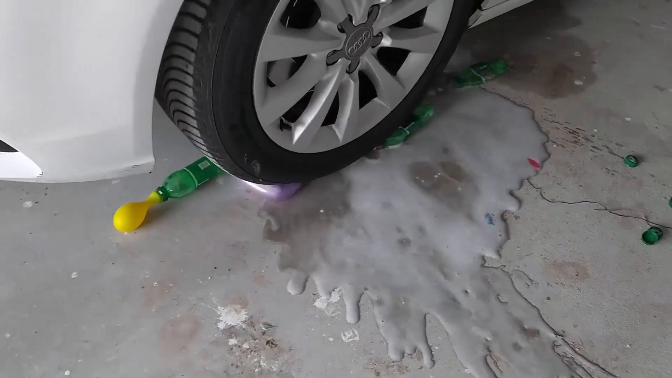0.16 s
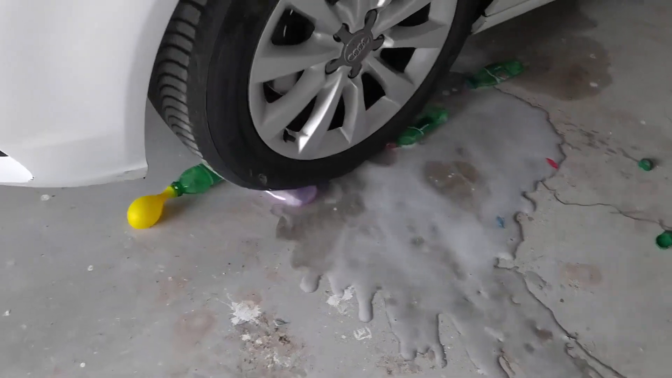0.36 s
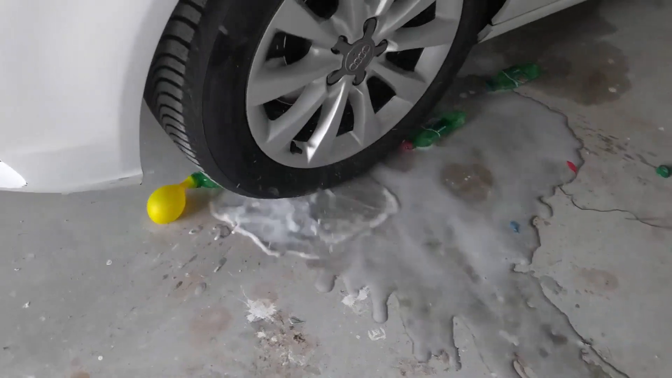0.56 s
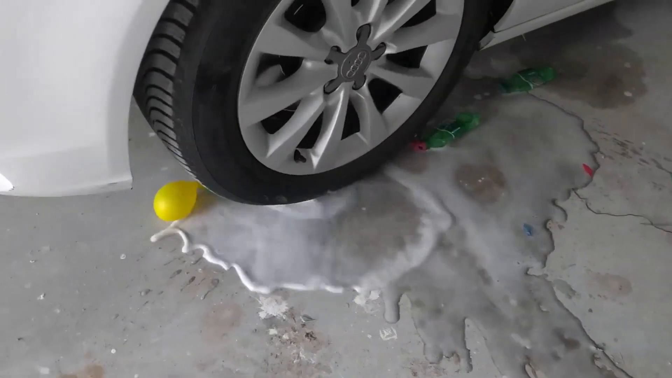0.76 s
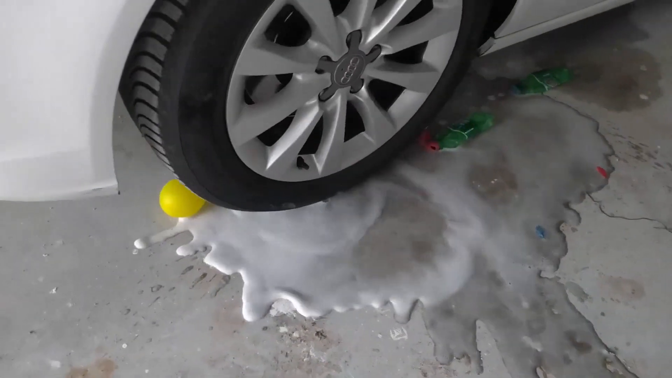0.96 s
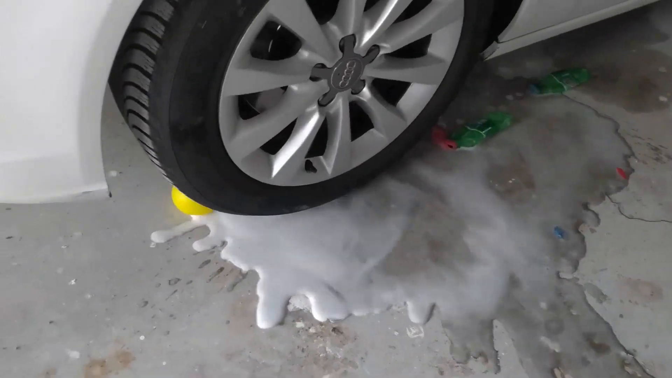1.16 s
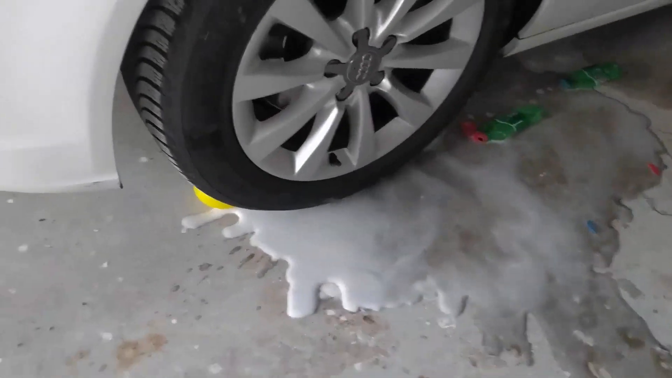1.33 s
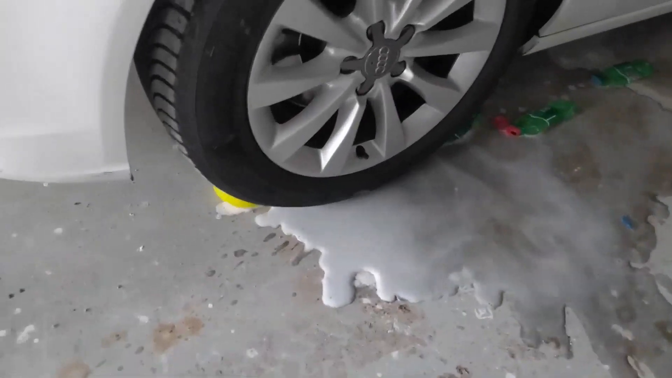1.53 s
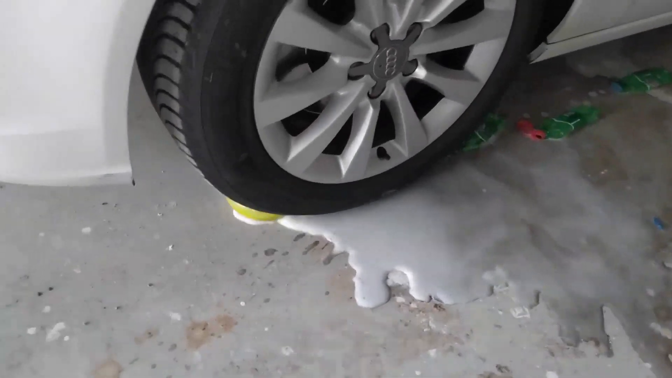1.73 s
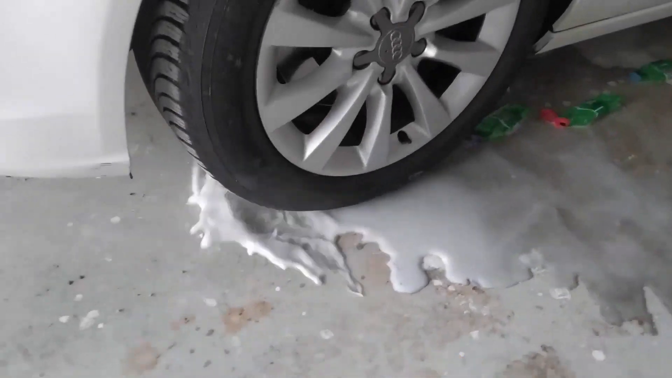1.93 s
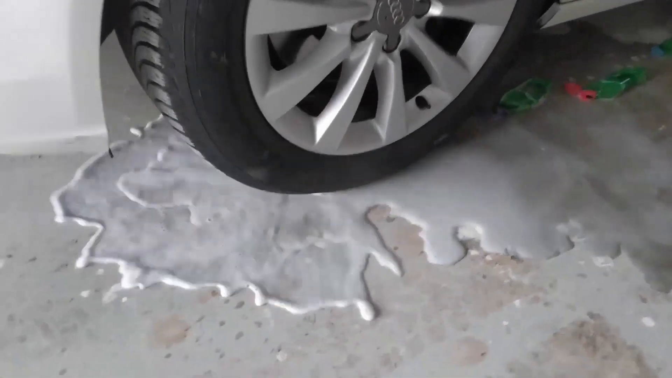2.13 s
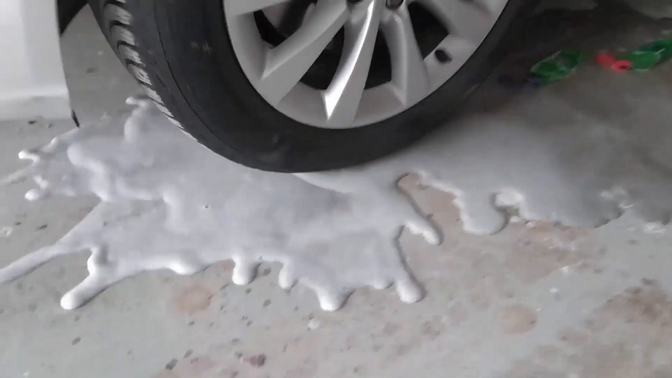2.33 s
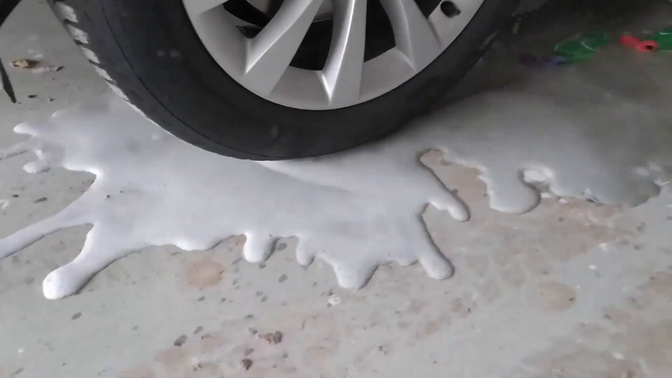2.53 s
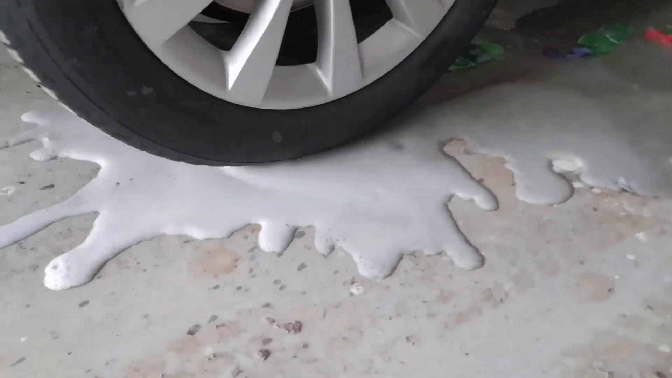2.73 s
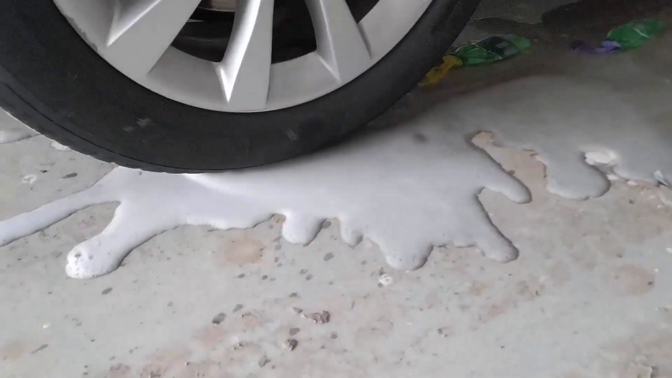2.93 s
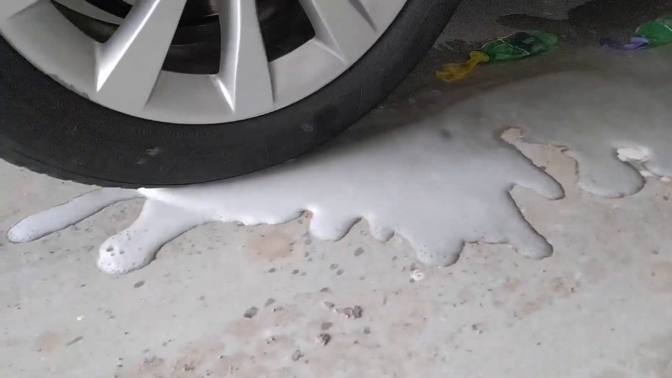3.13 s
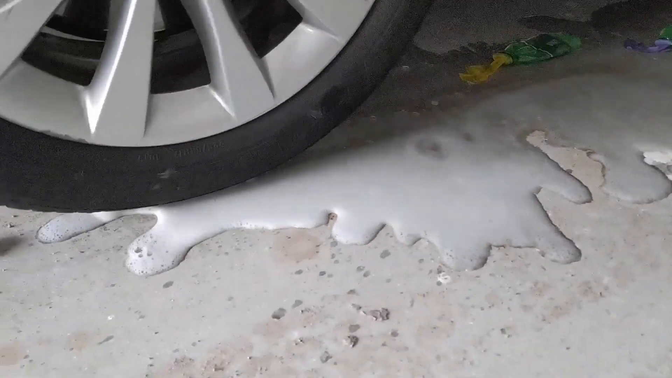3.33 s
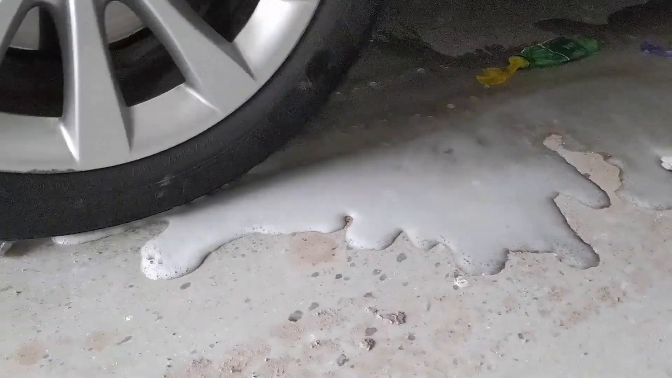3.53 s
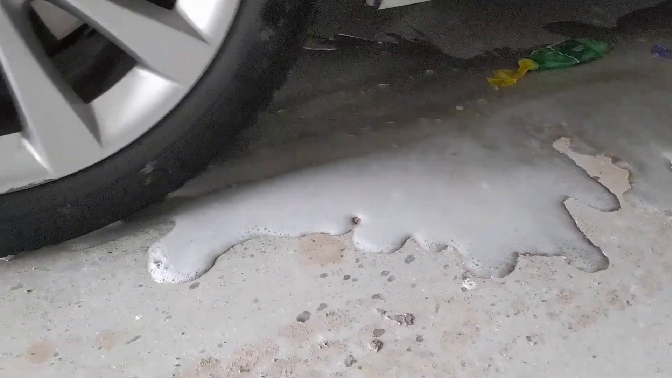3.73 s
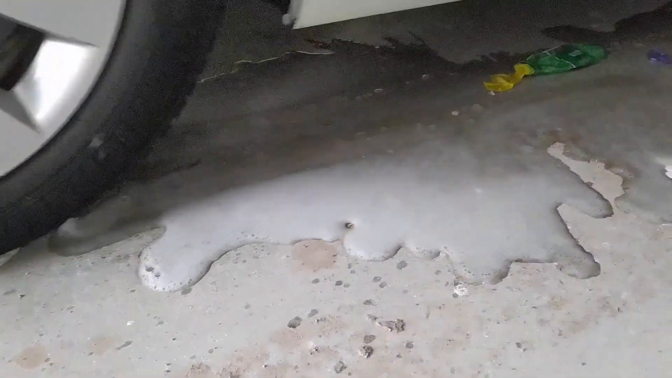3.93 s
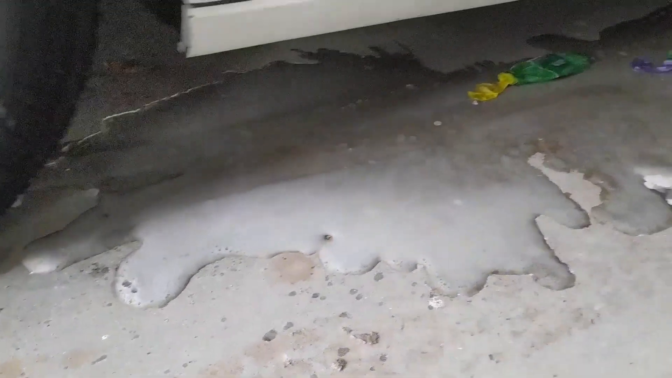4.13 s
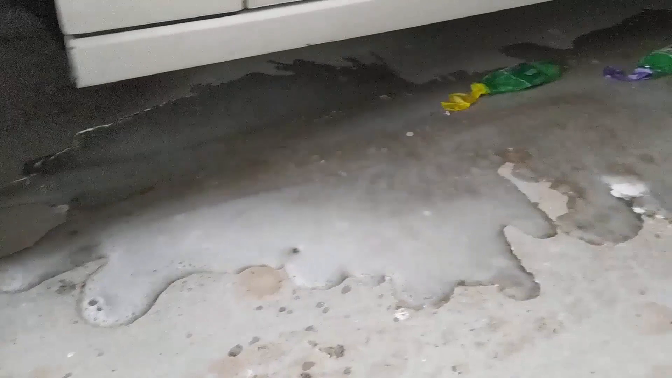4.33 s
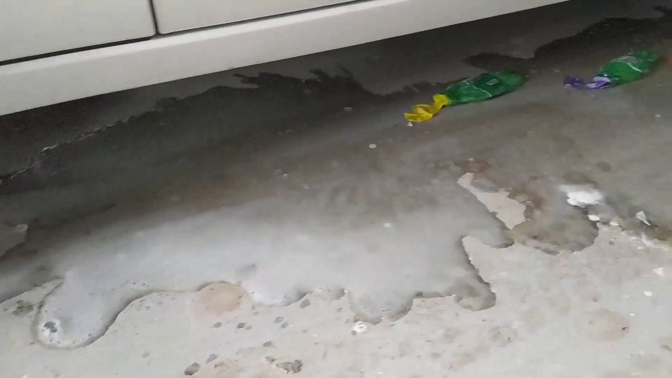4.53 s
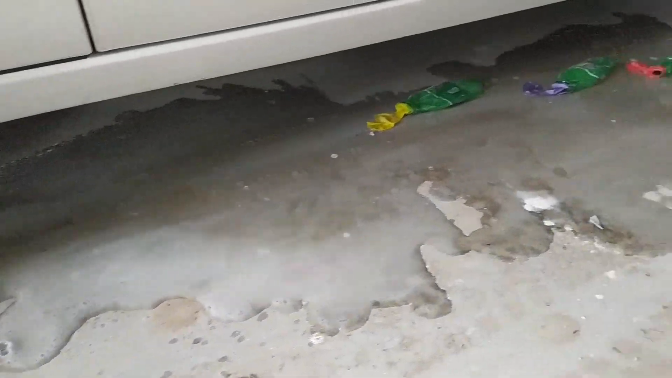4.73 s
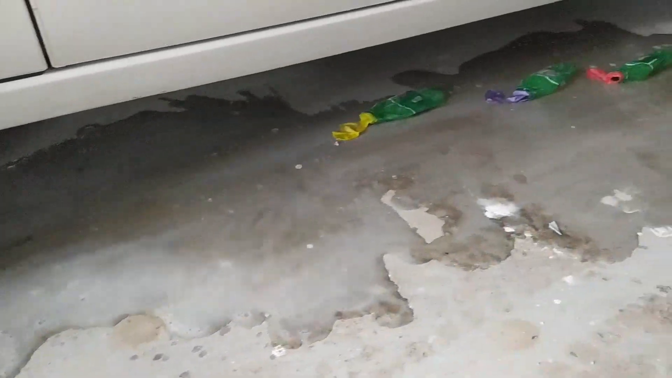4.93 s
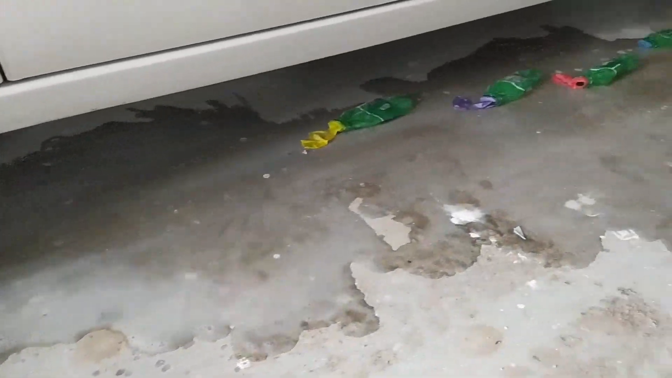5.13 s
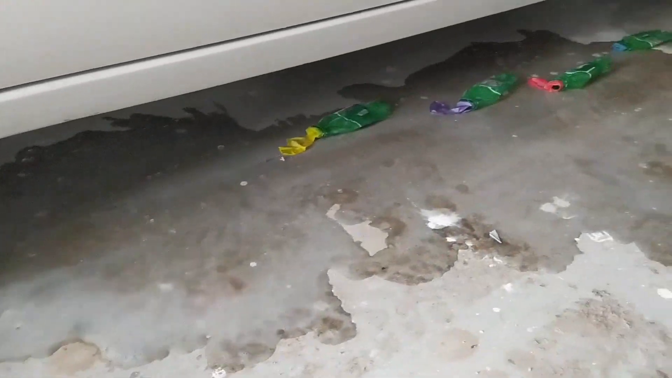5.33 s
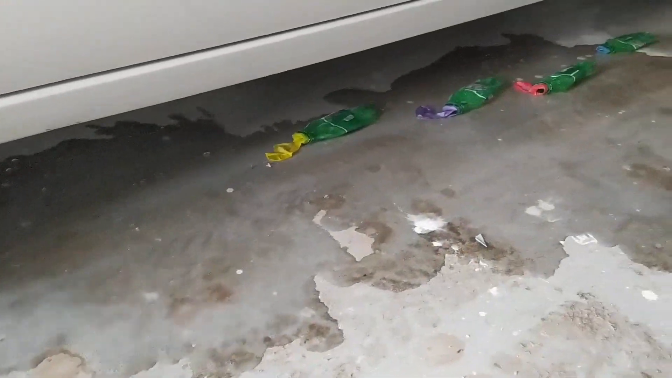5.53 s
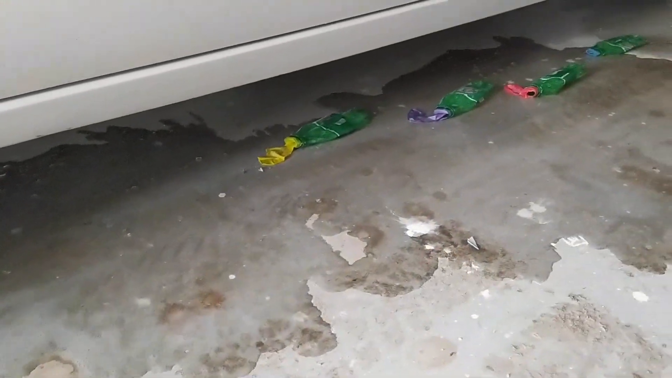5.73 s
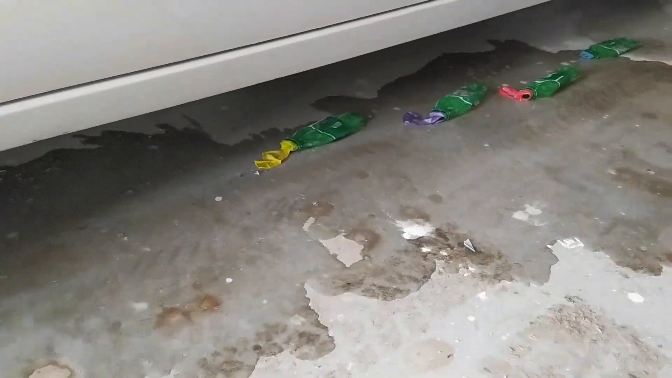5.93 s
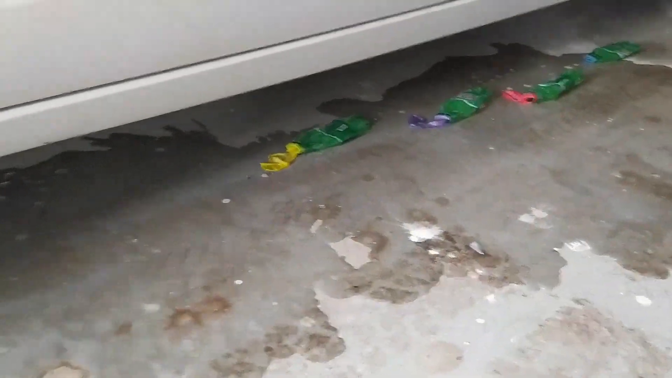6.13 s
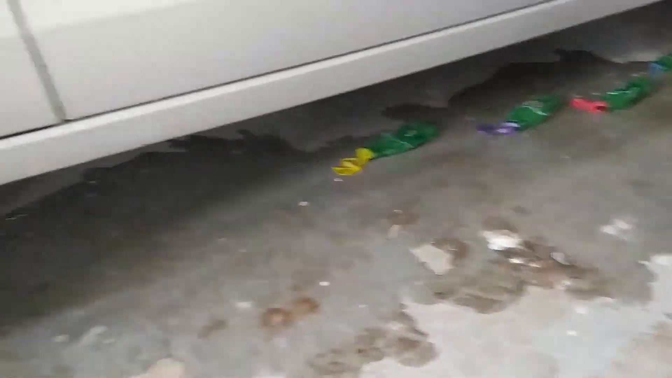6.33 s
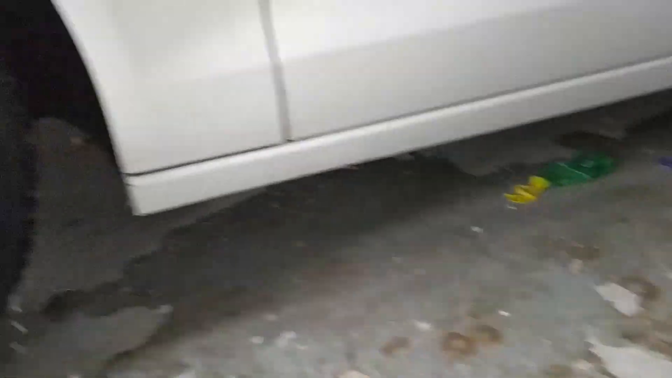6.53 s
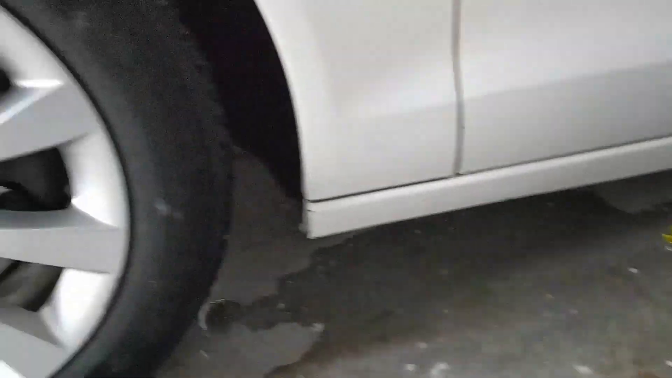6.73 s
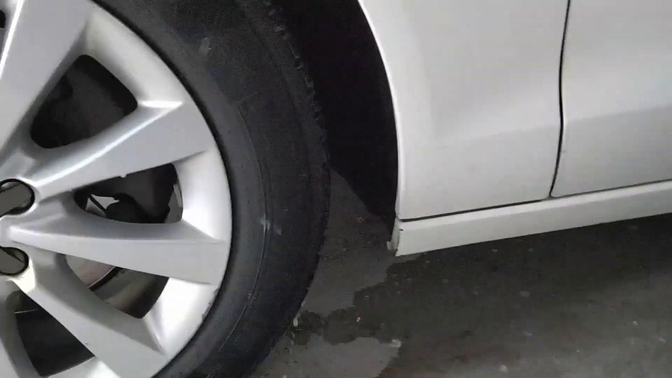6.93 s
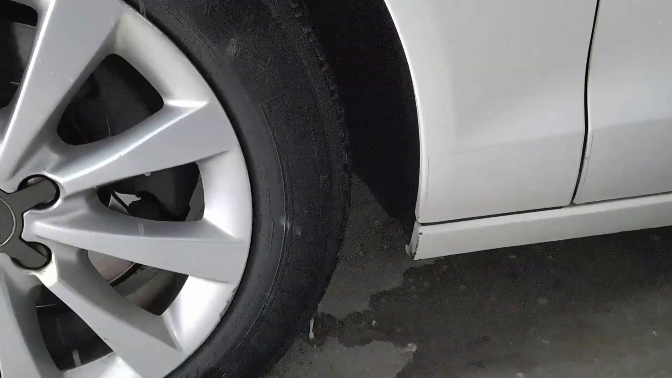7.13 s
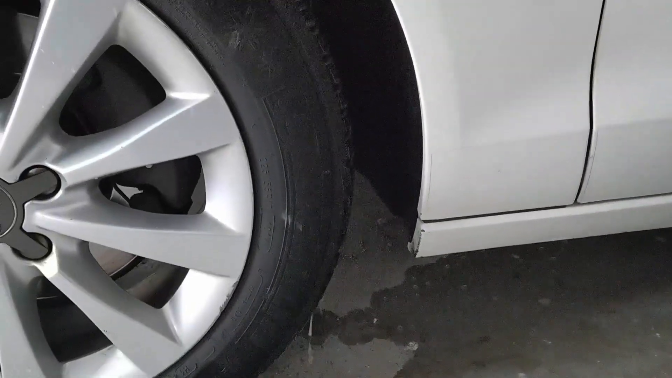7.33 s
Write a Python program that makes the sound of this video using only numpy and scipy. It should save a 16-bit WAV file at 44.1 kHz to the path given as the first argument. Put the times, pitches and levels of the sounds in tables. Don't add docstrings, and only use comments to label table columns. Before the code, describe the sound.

In a hard concrete garage, heard very close in stereo, an earlier burst's ring decays over steady bright foam fizz and a low idling engine. From 0.1 to 0.5 s plastic snaps, spits and knocks, thickening into crackle. At 0.6 s a balloon explodes: a full-scale bang, a jet of foam, the level ducked then swelling back with mid-pitched fluttering echoes. Around 1.1-1.4 s come sharp cracks and strong hollow bottle pops, then a rubbing rasp; small knocks at 1.9 s. At 2.0 s a second bang rings out, followed by squirting foam, a bright rasp at 2.2 s and wet slaps near 2.4 s. The ringing dies by 3 s. Fizz and squelching tread continue, with a knock and groan at 3.8 s, a wet snap at 4.1 s and sparse ticks to 5 s. Everything thins to faint hiss, low rumble, soft rubbing around 6.7-7.1 s and a last tiny snap at 7.3 s.

```python
import sys
import numpy as np
from scipy import signal
from scipy.fft import rfft, irfft, next_fast_len
from scipy.io import wavfile
from scipy.ndimage import uniform_filter1d, map_coordinates

SR = 44100
rng = np.random.default_rng(int(sys.argv[2]) if len(sys.argv) > 2 else 0)


def persist_wave(psi):
    counts = np.round(np.clip(psi, -1, 1) * 32767).astype(np.int16)
    wavfile.write(sys.argv[1], SR, np.atleast_2d(counts).T)


def convert_level_to_amplitude(level_db):
    exponent = np.asarray(level_db, float) / 20
    return 10 ** exponent


N = 329427
TIME = np.arange(N) / SR

# start in seconds, blast in dB, garage ringing in dB,
# recorder gain drop in dB, gain recovery in seconds.
BURSTS = [
    (-.5, 0, 25, 8.5, .1),
    (0.61, 11.5, 31, 17.5, 0.085),
    (1.994, 9, 33, 16.5, 0.13),
]
# frequency in Hz, density in dB per Hz.
BLAST = [(15, -43.5), (25, -13.5), (326, -10.5), (591, -1), (1100, -5.5), (1560, -11.5), (3160, -16.5),
         (3430, -29.5), (4140, -21.5), (8360, -14.5), (16000, -36.5)]
# frequency in Hz, density in dB per Hz.
RINGING = [
    [(35, -51.5), (60, -22.5), (118, -35.5), (189, -9.5), (503, -3.5), (1380, -8.5), (5330, -31),
     (8510, -12.5), (16000, -44)],
    [(35, -59.5), (60, -38), (108, -29), (262, -11), (294, -15), (448, -6), (503, -8), (553, -4.5),
     (1060, -1), (1140, -2), (2000, -11.5), (2500, -22.5), (3400, -27), (8120, -20.5), (16000, -43)],
    [(35, -61.5), (60, -29.5), (146, -21.5), (238, -10), (448, -8.5), (515, -3), (593, -6), (749, -0.5),
     (1110, -5.5), (1440, -13.5), (2090, -14), (2600, -23), (3400, -26), (5330, -24), (8710, -17),
     (16000, -56.5)],
]
# frequency in Hz, t60 in seconds.
GARAGE_T60 = [(60, 1.9), (200, 1.78), (600, 1.737), (1200, 1.067), (2500, 1.61), (5000, 0.65),
              (10000, 0.52)]
# delay after the burst in seconds, pitch in Hz, dB over the blast.
ARCH = [
    (.0016, 1000, -1.7),
    (.0015, 2700, -2.5),
    (.0015, 4400, -7.5),
    (.002, 8500, -7.5),
    (.002, 12500, -18.5),
    (.0036, 800, -4.4),
    (.0037, 4200, -13),
    (.0098, 950, -6.5),
    (0.0146, 600, -6.5),
]
ARCH_DB = [0, 0.5, -5.5]
BUILD_S, EVEN = 0.0063, 0.28
VENT_HZ = 4.5

# time in seconds, level in dB.
PUDDLE = [(0, -46), (.4, -43.5), (2.6, -44), (4.3, -44.5), (6.57, -54.5), (7.47, -59)]
# height in seconds, rise in seconds, ebb in seconds, dB over the puddle.
GUSHES = [
    (.5, 0.066, 0.17, 7),
    (.71, 0.091, 0.36, 15),
    (2.18, .16, 0.54, 12),
    (3.81, 0.307, 0.14, 3.5),
]
# frequency in Hz, density in dB per Hz.
FINE = [(3240, -51), (5500, -11), (7220, -7.5), (8110, -0.5), (8680, -0.5), (10200, -5), (11300, -16.5),
        (13000, -16), (15200, -21), (16000, -32.5)]
# frequency in Hz, density in dB per Hz.
COARSE = [(710, -21), (1200, -19), (1670, -11.5), (2850, -13), (3160, -13), (4110, -6), (7100, -8),
          (8000, -22), (10400, -21), (16000, -29.5), (17000, -120)]
COARSE_DB, FINE_SHARE = -8, 0.14

# time in seconds, level in dB.
ROLL = [(2.9, -50), (3.36, -51), (3.6, -54), (3.87, -51.5), (4.05, -52.5), (4.55, -49.5), (4.82, -57),
        (5.4, -59.5), (5.65, -64.5), (5.83, -65.5), (6.1, -62.5), (6.5, -65), (6.92, -61), (7.47, -68)]
# frequency in Hz, density in dB per Hz.
TREAD = [(180, -30), (300, 2), (762, -2), (978, -1), (1300, -5.5), (1980, -3.5), (3080, -7), (4000, -7),
         (5200, -16.5), (8800, -120)]
# frequency in Hz, density in dB per Hz.
DRONE = [(90, -30.5), (130, -7), (155, -1.5), (200, -3.5), (280, -2.5), (340, -26), (450, -23)]
DRONE_DB, DRONE_FOLLOWS = -56.5, 1
# time in seconds, level in dB.
ENGINE = [(0, -60), (2.2, -62), (3.1, -59), (4.7, -60), (5.2, -59.5), (5.9, -63.5), (6.87, -57.5),
          (7.47, -60)]
# frequency in Hz, density in dB per Hz.
RUMBLE = [(8.8, -37.5), (15, -4.5), (38, -0.5), (54, -7.5), (81, -5), (130, -15), (170, -42), (290, -120)]
BOOM_DB, BOOM_RISE_S, BOOM_T60_S = -49.5, 0.099, 2.9
FIRING_HZ = 32.17
# multiple of the firing rate, dB over its rumble.
FIRING = [(1, -7), (2, -24), (3, -23.5), (8, -14)]
# start in seconds, end in seconds, level in dB,
# then modes of pitch in Hz, width in Hz, level in dB.
RUBS = [
    (3.728, 3.762, -44, [(396, 140, 0)]),
    (3.87, 4.063, -48.5, [(154, 23, -2), (305, 45, -6), (750, 150, -24), (1100, 140, -16)]),
    (4.4, 4.949, -55.5, [(161, 53, -3.5), (91, 64, -4)]),
    (6.657, 7.12, -58.5, [(272, 62, 1), (382, 96, -2.5), (807, 610, -30), (1250, 250, -8), (1590, 90, -3), (2000, 470, -2), (2790, 130, -9)]),
    (1.39, 1.72, -44.5, [(800, 200, 2.5), (1150, 340, -5), (2000, 720, 0.5)]),
    (0, 0.044, -39.5, [(1250, 520, 0)]),
    (3.96, 4.0, -51, [(200, 120, -2), (900, 550, -3)]),
    (2.212, 2.279, -25.5, [(3300, 890, -2.5), (4700, 1500, 3), (5450, 590, 2)]),
    (3.775, 3.86, -46, [(650, 620, -4), (1200, 310, 2)]),
    (2.45, 3.0, -53, [(950, 170, 0)]),
]

# peak in seconds, pitch in Hz, level in dB, left minus right in dB.
SNAPS = [(.1165, 7500, -25, -4), (0.259, 1650, -26, -8), (0.3722, 8400, -19, -3), (.26, 610, -25.5, -10),
         (.464, 600, -39, 0), (.465, 4400, -30, 0), (0.473, 4100, -20, 0), (.476, 2500, -27, 0),
         (.487, 3600, -28, 0), (.493, 8000, -28, 3), (.481, 3300, -20, 0), (0.5102, 1100, -31, 4),
         (1.136, 3300, -30, 0), (1.138, 5600, -28, 0), (1.3215, 6500, -22, -4), (1.647, 2400, -34, -6),
         (1.2173, 3530, -31, 1.5), (1.3197, 3300, -34, 8), (1.3225, 4250, -16.5, -4), (1.361, 8650, -21, 1),
         (1.364, 2300, -23, -11), (1.37, 1200, -33, -5), (1.9045, 2000, -21, 3), (1.902, 3070, -37, 0),
         (1.912, 1250, -35, -2), (2.2155, 3300, -15, 5), (2.223, 4250, -9, 4), (2.232, 5300, -17, -1),
         (2.243, 3300, -15, 2), (2.263, 4700, -22, -4), (2.273, 5000, -25, 0), (2.367, 2780, -27, 0),
         (2.4602, 3540, -22, 2), (2.466, 5240, -24, 0), (3.781, 714, -25.5, -2), (3.778, 1150, -27, 4),
         (3.822, 740, -31, -10), (3.819, 1150, -30, 5), (3.838, 1150, -36, 2), (3.853, 1000, -45, 0),
         (4.097, 1200, -31, 9), (4.111, 1900, -38, 0), (4.124, 1300, -38.5, 4), (6.155, 4480, -54.5, -0.5),
         (6.27, 4000, -52.5, 0), (6.297, 4010, -53, 0), (6.601, 4200, -43.5, 5), (6.603, 6350, -51, -3)]
# peak in seconds, pitch in Hz, level in dB, left minus right in dB.
TICKS = [(.3695, 10000, -27, 6), (.3695, 13500, -36, 0), (.4235, 2500, -26.5, 2), (.4625, 3000, -34, 0),
         (.4635, 4600, -33, 0), (.4748, 7600, -20, -3), (.475, 13430, -35, 0), (.5065, 13000, -33, 3),
         (.508, 10500, -31, 3), (.513, 5530, -24, 0), (1.3222, 8560, -21, -4), (1.3222, 13000, -33, -4),
         (1.3618, 9900, -20, 0), (1.3636, 8600, -15, -3), (1.3636, 12800, -26, 0), (1.3634, 4400, -20, -8),
         (1.3612, 14500, -33, 0), (1.9942, 12500, -14, -4), (1.9948, 15200, -16, -4), (1.998, 8900, 5, 2.5),
         (2.0, 14500, -14.5, 0), (2.0125, 12650, -19, -4), (1.1355, 6200, -23, 0), (1.1358, 3400, -26, 0),
         (1.3222, 3300, -22, -4), (1.3222, 5800, -25, -4), (2.021, 8600, -1, 1.5), (2.369, 9600, -22, 8),
         (2.368, 13560, -31, 3), (2.375, 5550, -26, 0), (2.463, 5000, -31, 2), (2.466, 3200, -33, 0),
         (2.468, 6270, -22, 0), (2.4695, 9700, -24, 0), (2.471, 4300, -27, 0), (2.474, 3600, -28, 0),
         (2.477, 8600, -26, 0)]
# peak in seconds, pitch in Hz, level in dB.
ECHOES = [(0.6804, 760.0, -10), (0.7363, 716, -6.5), (0.7493, 690.0, -4), (0.7626, 1000.0, -8.5),
          (0.834, 680.0, -8), (0.8524, 590.0, -13), (0.8938, 940.0, -14.5), (0.9025, 740.0, -24),
          (0.9596, 900.0, -31), (1.0382, 690.0, -17), (1.0939, 870, -15.5), (1.1146, 650.0, -21),
          (1.254, 660.0, -29), (1.4223, 950.0, -25), (1.473, 840.0, -26), (1.5597, 740.0, -33),
          (1.6471, 730.0, -44), (1.6743, 780.0, -37), (1.7, 2170.0, -42), (2.1, 684, -6),
          (2.1583, 800.0, -5), (2.2047, 736, -11), (2.2136, 582, -2), (2.2238, 530.0, -11),
          (2.245, 716, -13), (2.2538, 683, -12), (2.2764, 550.0, -11.5), (2.3209, 719, -8),
          (2.375, 586, -8.5), (2.467, 724, -19), (2.4827, 780.0, -14), (2.5431, 750.0, -22),
          (2.6019, 690.0, -23), (2.6663, 750.0, -30), (2.7441, 810, -27), (2.7875, 610.0, -25),
          (2.8091, 710.0, -36), (2.8762, 680.0, -33), (2.894, 620.0, -43), (2.929, 480.0, -37)]
SNAP_S, SNAP_CYCLES = .0003, 1.2
TICK_S, TICK_CYCLES = .00025, 1.1
ECHO_CYCLES, ECHO_DB = 1, 2
PACKET_S = .02

# start in seconds, level in dB, t60 in seconds.
SPITS = [(0.117, -29.5, 0.033), (.369, -28, 0.017), (0.417, -33, .03), (.425, -29, 0.047),
         (0.473, -24.5, .021), (.506, -22.5, 0.094), (1.133, -35.5, .02), (1.196, -34.5, 0.053),
         (1.32, -23.5, 0.013), (1.3594, -22, 0.025), (2.367, -23, 0.086), (2.46, -25.5, 0.069),
         (3.775, -30.5, 0.059), (4.094, -21, 0.098), (4.452, -34, .04), (4.622, -25.5, 0.028),
         (4.999, -34, 0.033), (6.035, -39.5, 0.023), (4.106, -30.5, 0.08), (7.341, -45, 0.039)]
# start in seconds, pitch in Hz, level in dB.
CREASES = [(.238, 1900, -46), (.256, 1640, -37), (.369, 7850, -41.5), (.418, 4500, -46.5),
           (.424, 2340, -34), (.461, 3270, -31.5), (.472, 4200, -26), (.479, 3235, -30),
           (.487, 1416, -42.5), (.266, 1500, -46.5), (.396, 1280, -39.5), (1.1355, 4360, -25.5),
           (1.135, 2220, -28), (1.196, 4530, -42), (1.319, 3020, -30.5), (1.3215, 4300, -23),
           (1.335, 3880, -32.5), (1.361, 4600, -33.5), (1.363, 2180, -23.5), (1.698, 2270, -36),
           (1.901, 1980, -35.5), (2.65, 3750, -35.5), (3.209, 1740, -41.5), (3.776, 2270, -47),
           (4.118, 1480, -45), (4.452, 2080, -45.5), (4.685, 2500, -46.5), (5, 2930, -49),
           (7.341, 4570, -52.5)]
# start in seconds, pitch in Hz, level in dB, rise in milliseconds.
KNOCKS = [(.256, 697, -33.5, 2.5), (.424, 546, -30.5, 1.5), (0.4245, 1130, -37, 1.5),
          (.461, 590, -27.5, 1.06), (.473, 520, -32, 1.3), (.499, 720, -23.5, 2.2),
          (.508, 380, -22.5, 0.63), (.508, 1145, -26, 0.48), (1.3032, 890, -9, 3.9),
          (1.3343, 982, -6.5, 3.7), (1.368, 1150, -15.5, 2.5), (1.9, 1230, -22.5, 2.15),
          (1.909, 1200, -29, 2), (3.56, 1160, -42.5, 1.5), (3.776, 890, -24, 2.2),
          (3.8168, 887, -27.5, 1.8), (3.85, 980, -54, 2), (4.095, 1020, -29, 1.3), (5, 1000, -49, 1),
          (5.14, 1015, -49, 1.1), (5.37, 1080, -55, 0.78), (7.08, 900, -57, 0.65)]
# start in seconds, pitch in Hz, level in dB.
SLAPS = [
    (.506, 4580, -27.5),
    (1.214, 2930, -33),
    (2.366, 3150, -28),
    (2.461, 2530, -29.5),
    (2.46, 4410, -24.5),
    (4.094, 4250, -57),
    (4.1, 1670, -43),
    (6.6, 4270, -57.5),
]
CREASE_T60_S, SLAP_T60_S, DAMPING = 0.032, 0.063, 0.93
CRACK, CRACK_T60_S = 1, 0.011
WALL_T60_S = 0.03
SLOW_DAMPS = 0.24
NEAR_ECHO = .48

# full flow in seconds, hold in seconds, fall in seconds, level in dB,
# brightness in dB per octave.
SQUIRTS = [
    (0.515, .01, 0.016, -39, -2),
    (0.622, 0.014, 0.028, -16.5, 0),
    (1.414, 0.034, 0.053, -35.5, -1.5),
    (2.014, 0.0091, 0.034, -18, -0.5),
    (2.077, 0.064, 0.048, -22.5, -1.5),
    (2.212, 0.066, 0.008, -22.5, -3.5),
    (2.232, 0.036, 0.014, -20, -1.5),
    (4.166, 0.026, 0.0195, -40.5, 2),
]
# frequency in Hz, level in dB.
JET = [(120, -55.5), (300, -28), (1000, -1), (2500, 3.5), (4500, -5), (6000, -3.5), (8500, 4.5),
       (10200, -5.5), (11500, -13.5), (16000, -19)]
SQUIRT_RISE_S = 0.0046

# frequency in Hz, left-right likeness.
ALIKE = [(60, 0.85), (130, 0.94), (290, 0.9), (640, 0.72), (1410, -0.092), (3100, 0.016), (6820, -0.003),
         (15000, -0.0076)]
# frequency in Hz, rarity in standard
RARITY = [(1800, 9), (2400, 2.2), (3300, .7), (4300, 1.3), (5500, .8), (7000, .4), (8000, 1.8),
          (10300, 1.8), (11200, .5), (12500, 1), (16000, .9)]
# frequency in Hz, left minus right in dB.
LEAN = [(125, 0.3), (500, 0.2), (1000, -1.5), (2500, 0.9), (5000, 0.4), (9000, -1.5), (11000, 5.5),
        (16000, -1.5)]
TOP_HZ = 15980


def unit(x):
    return x / np.sqrt(np.mean(x ** 2) + 1e-20)


def along(points, hz):
    f, v = np.transpose(points)
    return np.interp(np.log(hz + 1), np.log(f + 1), v)


def over_time(rows):
    s, db = np.transpose(rows)
    return np.interp(TIME, s, db)


def wobble(rate):
    coarse = TIME[::16]
    knots = rng.standard_normal(int(N * rate / SR) + 4)
    return np.interp(TIME, coarse, map_coordinates(knots, [coarse * rate]))


def noise(n):
    return rng.standard_normal((2, n))


def filtered(x, response):
    m = next_fast_len(x.shape[-1] + 8192)
    return irfft(rfft(x, m) * response(np.fft.rfftfreq(m, 1 / SR)), m)[..., :x.shape[-1]]


def diffuse(pair, spectrum):
    def response(hz):
        turn = np.arccos(np.clip(along(ALIKE, hz), -1, 1)) / 2
        return convert_level_to_amplitude(along(spectrum, hz)) * np.array([np.cos(turn), np.sin(turn)])

    mid, side = filtered(pair, response)
    return unit(np.array([mid + side, mid - side]))


def add(track, s, sound):
    i = round(s * SR)
    part = sound[:, max(-i, 0):N - i]
    track[:, max(i, 0):max(i, 0) + part.shape[1]] += part


def packet(hz, db, half_s, lean_db, turn):
    t = np.arange(round(2 * PACKET_S * SR)) / SR - PACKET_S
    side = np.array([[.5], [-.5]])
    wave = np.cos(2 * np.pi * hz * t + turn * side)
    return convert_level_to_amplitude(db + lean_db * side) * np.exp(-(t / half_s) ** 2) * wave


def tail(spectrum, shorter=1):
    hz, t, z = signal.stft(diffuse(noise(2 * SR), spectrum), SR, nperseg=256)
    t60 = shorter * along(GARAGE_T60, hz)[:, None]
    decay = signal.istft(z * convert_level_to_amplitude(-60 * t / t60), SR, nperseg=256)[1]
    decay *= np.clip(np.arange(decay.shape[1]) / (0.0026 * SR), 0, 1)
    return decay / np.linalg.norm(decay[0])


def garage_ringing(colour):
    ringing = tail(colour)
    n = ringing.shape[1]
    power = np.sum(ringing ** 2, axis=0)
    peaks = np.abs(uniform_filter1d(power, size=200) / uniform_filter1d(power, size=4000)) + 1e-3
    flutter = convert_level_to_amplitude(.6 * wobble(70.05)[:n]) * (1 - np.exp(-TIME[:n] / BUILD_S))
    return flutter * ringing / peaks ** (EVEN / 2)


def gas_shove():
    t = TIME[:SR // 2]
    shove = (1 - t / 0.0073) * np.exp(-t / 0.0095) * (1 - np.exp(-t / 0.0021))
    return filtered(shove, lambda hz: 1j * hz / (VENT_HZ + 1j * hz))


def bursts():
    out, t = np.zeros((2, N)), np.arange(SR // 10) / SR
    for (s, blast_db, garage_db, _, _), colour, arch_db in zip(BURSTS, RINGING, ARCH_DB):
        for late, db in ((0, -1), (.008, -7)):
            tear = diffuse(noise(len(t)), BLAST) * convert_level_to_amplitude(-60 * t / 0.04) * (1 - np.exp(-t / 0.0008))
            add(out, s + late, convert_level_to_amplitude(blast_db + db) * tear)
        for late, hz, db in ARCH:
            bounce = packet(hz, blast_db + arch_db + db, SNAP_S + 0.36 / hz, 0, turn=0.46)
            add(out, s + late - PACKET_S, bounce)
        add(out, s, convert_level_to_amplitude(blast_db - 12) * gas_shove() * np.ones((2, 1)))
        add(out, s, convert_level_to_amplitude(garage_db) * garage_ringing(colour))
    return out


def fizz(spectrum, rate, spread_db, grainy):
    pops = (rng.random((2, N)) < rate / SR) * convert_level_to_amplitude(spread_db * rng.random((2, N)))
    pops *= np.sign(noise(N))
    return diffuse(noise(N) + grainy * unit(pops), spectrum)


def foam():
    gush_db = sum(np.interp(TIME, [s - rise, s, s + ebb], [0, db, 0]) for s, rise, ebb, db in GUSHES)
    puddle_db = over_time(PUDDLE) + 0.25 * wobble(3.0)
    fine_db = puddle_db + FINE_SHARE * gush_db + 4.5 + 0.55 * wobble(25)
    coarse_db = puddle_db + COARSE_DB + gush_db + 5.5 + 1.0 * wobble(26)
    fine = convert_level_to_amplitude(fine_db) * fizz(FINE, 900, spread_db=4.5, grainy=0.68)
    return fine + convert_level_to_amplitude(coarse_db) * fizz(COARSE, 70, spread_db=6.5, grainy=0.41)


def boom():
    since = [np.clip(TIME - s, 0, None) for s, *_ in BURSTS[1:]]
    return sum(convert_level_to_amplitude(BOOM_DB - 60 * t / BOOM_T60_S) * (1 - np.exp(-(t / BOOM_RISE_S) ** 2)) for t in since)


def firing():
    turn = 2 * np.pi * np.cumsum(FIRING_HZ * (1 + 0.025 * wobble(2.6))) / SR
    return sum(convert_level_to_amplitude(db + 2.5 * wobble(4.8)) * np.sin(k * turn) for k, db in FIRING)


def rubs():
    out = np.zeros((2, N))
    for start, end, db, modes in RUBS:
        rasp = diffuse(noise(round((end - start) * SR)), [(100, 0), (10000, 0.0014)])
        hum = filtered(rasp, lambda f: sum(convert_level_to_amplitude(level) / (1 + (2 * (f - hz) / width) ** 2)
                                           for hz, width, level in modes))
        add(out, start, convert_level_to_amplitude(db) * unit(hum) * np.hanning(hum.shape[1]) ** 0.11)
    return out


def car():
    tread_db, engine = over_time(ROLL), convert_level_to_amplitude(over_time(ENGINE))
    drone_db = DRONE_DB + DRONE_FOLLOWS * (tread_db - ROLL[0][1])
    tread = convert_level_to_amplitude(tread_db + 1.0 + 1.0 * wobble(15)) * fizz(TREAD, 160, spread_db=8.0, grainy=0.38)
    drone = convert_level_to_amplitude(drone_db + 3.0 + 0.79 * wobble(4.6)) * diffuse(noise(N), DRONE)
    rumble = (engine + boom()) * convert_level_to_amplitude(-1.5 + 1.5 * wobble(14)) * diffuse(noise(N), RUMBLE)
    return tread + drone + rumble + engine * firing() + rubs()


def snaps():
    out = np.zeros((2, N))
    for s, hz, db, lean_db in SNAPS:
        add(out, s - PACKET_S, packet(hz, db, SNAP_S + SNAP_CYCLES / hz, lean_db, turn=2.2))
    for s, hz, db, lean_db in TICKS:
        add(out, s - PACKET_S, packet(hz, db, TICK_S + TICK_CYCLES / hz, lean_db, turn=0.87))
    for s, hz, db in ECHOES:
        add(out, s - PACKET_S, packet(hz, db + ECHO_DB, ECHO_CYCLES / hz, 0, turn=hz / 700))
    return out


def spits(out, t, start):
    colour = [(2000, -15), (5500, -9.5), (8500, 0.5), (10300, -5), (11500, -20), (16000, -21.5)]
    for s, db, t60 in SPITS:
        add(out, s, convert_level_to_amplitude(db - 60 * t / t60) * diffuse(noise(len(t)), colour) * start)


def creases(out, t, rows, t60, dry, start):
    for s, hz, db in rows:
        colour = [(hz / 4, -30), (hz / 5.2, -7), (hz, 0), (hz * 1.35, -7), (hz * 1.6, -18), (hz * 5, -45)]
        crackle = diffuse(noise(len(t)), colour)
        ring = np.sin(2 * np.pi * hz * t + rng.uniform(0, 1.9, (2, 1)))
        fade = convert_level_to_amplitude(db - 60 * t / t60 * (hz / 2500) ** (dry * DAMPING))
        add(out, s, fade * (1.45 * crackle + 1.2 * dry * ring) * start)


def knocks(out, t):
    for s, hz, db, rise_ms in KNOCKS:
        rise = rise_ms / 1000
        turn = rng.uniform(-0.21, 1, (2, 1)) * hz / 1500
        second = convert_level_to_amplitude(-4.5) * min(1, 0.0018 / rise) * np.sin(2 * np.pi * 1.1 * hz * t - turn)
        modes = np.sin(2 * np.pi * hz * t + turn) + second
        colour = [(hz / 8, -50), (hz / 4, -25), (hz / 2, 0), (hz * 1.5, -2), (hz * 3.8, -14), (hz * 8, -40)]
        thud = 0.87 * min(1, 0.0016 / rise) * diffuse(noise(len(t)), colour)
        fade = convert_level_to_amplitude(db + 4.5 - 60 * t / WALL_T60_S * rise_ms ** SLOW_DAMPS)
        add(out, s, fade * (modes + thud) * (1 - np.exp(-t / rise)) ** 2)


def bottles():
    out, t = np.zeros((2, N)), np.arange(SR // 8) / SR
    soft = 1 - np.exp(-t / 0.00022)
    sudden = soft * (1 + CRACK * convert_level_to_amplitude(-60 * t / CRACK_T60_S)) / 1.5
    spits(out, t, sudden)
    creases(out, t, CREASES, CREASE_T60_S, dry=1, start=sudden)
    knocks(out, t)
    creases(out, t, SLAPS, SLAP_T60_S, dry=.3, start=soft)
    out = filtered(out, lambda hz: 1 / (1 + (230 / (hz + 1)) ** 4))
    echo = tail([(100, 0.017), (10000, 0.0055)], shorter=NEAR_ECHO)
    return out + convert_level_to_amplitude(-5) * signal.fftconvolve(out, echo, axes=1)[:, :N]


def squirts():
    out = np.zeros((2, N))
    rise = SQUIRT_RISE_S
    t = np.arange(SR // 2) / SR - 4 * rise
    for s, hold, fall, db, tilt_db in SQUIRTS:
        swell = np.where(t < 0, np.exp(-(t / rise) ** 2), np.exp(-np.clip(t - hold, 0, None) / fall))
        sputter = convert_level_to_amplitude(2.0 * unit(uniform_filter1d(rng.standard_normal(len(t)), size=50)))
        colour = [(hz, level + tilt_db * np.log2(hz / 4000)) for hz, level in JET]
        add(out, s - 4 * rise, convert_level_to_amplitude(db) * swell * diffuse(sputter * noise(len(t)), colour))
    return out


def scene():
    return bursts() + foam() + car() + snaps() + bottles() + squirts()


def gaps(x, depth_db):
    hz, _, z = signal.stft(x, SR, nperseg=1024)
    field = uniform_filter1d(rng.standard_normal(z.shape[1:]), size=5, axis=0)
    field = unit(uniform_filter1d(field, size=3, axis=1))
    loss_db = depth_db * np.clip(field - along(RARITY, hz)[:, None], 0, 1)
    return signal.istft(z * convert_level_to_amplitude(-loss_db), SR, nperseg=1024)[1][:, :N]


def band_limit(x):
    return signal.sosfilt(signal.butter(12, 16830, fs=SR, output="sos"), x)


def record(dry):
    drop_db = sum(db * np.exp(-np.clip(TIME - s, 0, None) / back) * (TIME >= s) for s, _, _, db, back in BURSTS)
    x = dry * convert_level_to_amplitude(-drop_db) * convert_level_to_amplitude([[.2], [-.2]])
    x = x / (1 + np.abs(x) ** 6) ** (1 / 6)
    x = gaps(x, depth_db=38)
    side = np.array([[.5], [-.5]])
    mix = filtered(x, lambda hz: np.where(hz < TOP_HZ, 1, convert_level_to_amplitude(-47.5)) * convert_level_to_amplitude(along(LEAN, hz) * side))
    return band_limit(mix)


dry = scene()
out = record(dry)
persist_wave(out)
```